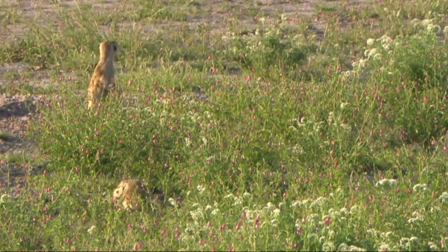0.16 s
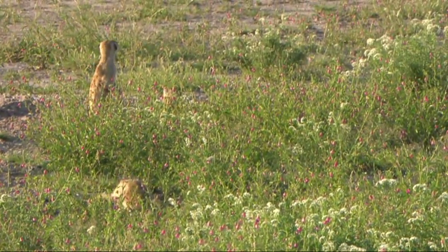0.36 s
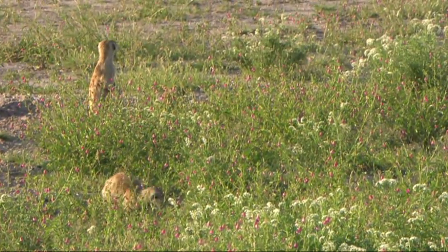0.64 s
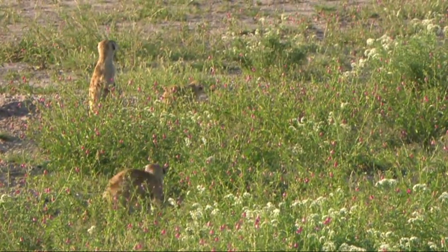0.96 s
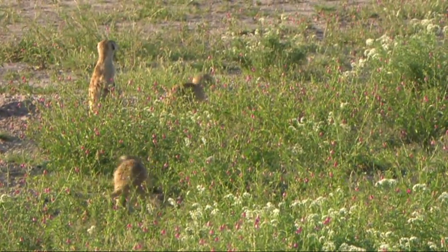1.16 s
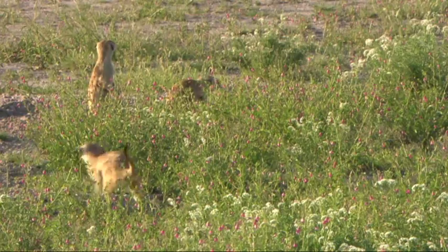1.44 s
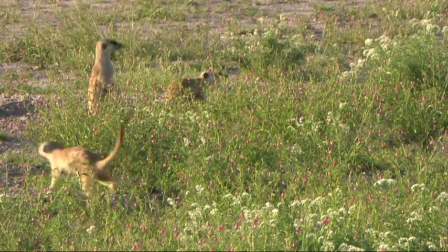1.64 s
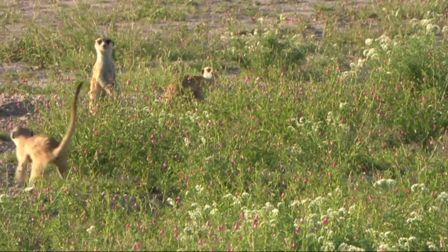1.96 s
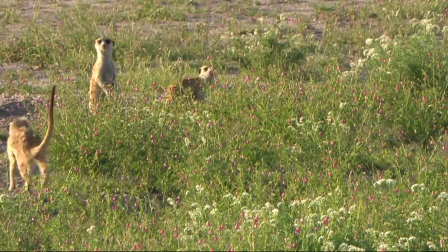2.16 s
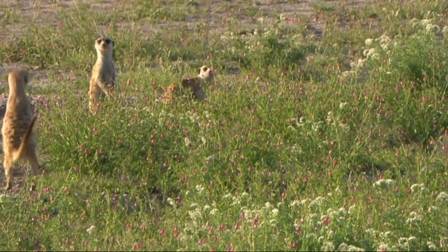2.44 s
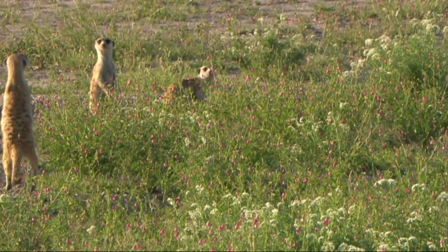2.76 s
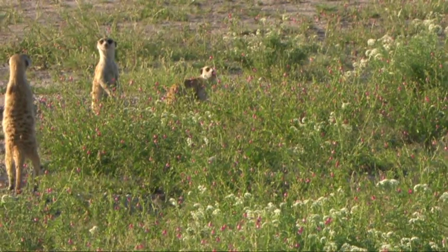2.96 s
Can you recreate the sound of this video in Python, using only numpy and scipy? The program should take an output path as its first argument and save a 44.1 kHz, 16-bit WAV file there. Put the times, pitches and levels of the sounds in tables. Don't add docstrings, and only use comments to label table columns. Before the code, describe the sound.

A nearby meerkat gives four harsh, rising, fluttering barks in quick succession while a fainter one overlaps farther off; one last distant bark follows, then low wind and faint hiss in an open field.

```python
import sys
import numpy as np
from scipy import signal
from scipy.fft import rfft, irfft, next_fast_len
from scipy.io import wavfile
from scipy.ndimage import uniform_filter1d, map_coordinates

SR = 44100
rng = np.random.default_rng(int(sys.argv[2]) if len(sys.argv) > 2 else 0)


def boost_factor(decibels):
    exponent = np.asarray(decibels, float) / 20
    return 10 ** exponent


def to_wav(sig):
    pcm = np.clip(np.atleast_2d(sig), -1, 1) * 32767
    pcm = np.round(pcm).astype(np.int16)
    wavfile.write(sys.argv[1], SR, pcm.T)


N = 136710

# time_s, low_pitch_hz, locked_pitch_hz, level_db, locked_share (of each beat, 0 none,
# 1 or more the whole beat)
NEAR_CALL_1 = [(0, 1148, 1390, -39.5, 0.5), (.03, 1148, 1370, -37.5, 0.72), (.048, 1175, 1367, -37, 1.11),
               (.053, 1160, 1428, -30.5, 1.2), (.06, 1150, 1500, -63, 1.1)]
NEAR_CALL_2 = [(.225, 590, 938, -53, 0.15), (.234, 660, 986, -44, 0.017), (.238, 700, 1045, -46.5, 0.031),
               (.278, 740, 1143, -40.5, 0.073), (.281, 794, 1173, -41.5, 0.064), (.3, 992, 1226, -43, 0.25),
               (.35, 1111, 1331, -40, 0.45), (.44, 1170, 1356, -38, 0.623), (.465, 1140, 1380, -35.5, 0.96),
               (.474, 1180, 1323, -34, 0.92), (.484, 1170, 1200, -63, 0.84)]
NEAR_CALL_3 = [(.583, 690, 1076, -49, 0.073), (.593, 740, 1085, -41.5, 0.1), (.62, 764, 1124, -40.5, 0.049),
               (.626, 792, 1154, -38.5, 0.13), (.642, 801, 1168, -40, 0.11), (.652, 957, 1219, -42, 0.47),
               (.675, 1100, 1271, -39.5, 0.56), (.71, 1120, 1335, -42.5, 0.47),
               (.74, 1103, 1320, -41, 0.63), (.76, 1135, 1321, -42.5, 0.47), (.79, 1145, 1380, -38.5, 0.34),
               (.802, 1215, 1370, -38, 0.64), (.816, 1245, 1393, -38.5, 0.46),
               (.826, 1260, 1400, -54, 0.51)]
NEAR_CALL_4 = [(.946, 587, 993, -48, 0.14), (.955, 615, 1001, -45.5, 0), (.959, 713, 984, -40, 0.076),
               (.972, 716, 1042, -41.5, 0.015), (.98, 812, 1083, -36.5, 0.031),
               (.992, 729, 1097, -41, 0.064), (.996, 826, 1144, -44, 0.03), (1.004, 908, 1204, -40.5, 0.37),
               (1.085, 1085, 1308, -41, 0.42), (1.107, 1107, 1333, -40, 0.54),
               (1.126, 1127, 1354, -38.5, 0.44), (1.185, 1201, 1380, -39, 0.56),
               (1.209, 1227, 1444, -31, 1), (1.221, 1188, 1305, -36.5, 1), (1.229, 1177, 1220, -65, 0.94)]
# time_s, low_pitch_hz, locked_pitch_hz, level_db, locked_share
FAR_CALL_LONG = [(.47, 797, 1140, -57, 0.12), (.505, 988, 1174, -57, 0.56), (.52, 974, 1197, -50.5, 0.62),
                 (.546, 1010, 1219, -54, 0.39), (.585, 1040, 1240, -51.5, 0.5),
                 (.65, 1090, 1306, -56, 0.41), (.703, 1120, 1390, -41, 0.56), (.715, 1190, 1387, -47.5, 1),
                 (.725, 1130, 1260, -50, 1), (.737, 1150, 1144, -75, 0.88)]
FAR_CALL_SHORT = [(1.76, 541, 816, -62, 0.36), (1.775, 604, 895.5, -53, 0), (1.794, 675, 970, -59, 0),
                  (1.798, 740, 1104, -53, 0.27), (1.814, 712, 1131, -53, 0.025),
                  (1.819, 797, 1159, -47.5, 0.1), (1.83, 763, 1192, -52, 0), (1.84, 1000, 1236, -53, 0.49),
                  (1.883, 1118, 1370, -48, 0.46), (1.89, 1140, 1417, -46.5, 0.68),
                  (1.905, 1110, 1283, -47.5, 1), (1.909, 1110, 1217, -63, 1), (1.914, 1050, 1116, -56.5, 1),
                  (1.924, 1000, 915, -54, 0.91)]
# time_s, low_pitch_hz, locked_pitch_hz, level_db, locked_share
SQUEAK_1 = [(.053, 1190, 1660, -44, 0.67), (.057, 1234, 1713, -45.5, 0.62), (.064, 1190, 1700, -43, 0.5),
            (.072, 1190, 1500, -50, 0.71), (.078, 1200, 1380, -60, 0.83)]
SQUEAK_3 = [(.812, 1215, 1640, -58, 0.58), (.818, 1220, 1754, -45, 0.69), (.824, 1227, 1785, -43, 0.77),
            (0.828, 1210, 1580, -44.5, 1), (.835, 1200, 1542, -66, 0.95)]
# time_s, beats_counted
NEAR_BEATS_1 = [(0, 0), (.033, 3), (.047, 4)]
NEAR_BEATS_2 = [(.284, -.5), (.304, 1), (.336, 3), (.436, 12), (.465, 14)]
NEAR_BEATS_3 = [(.64, -.5), (.652, 0), (.673, 1), (.691, 2), (.708, 3), (.737, 4), (.76, 5), (.803, 8),
                (.815, 9), (.83, 10)]
NEAR_BEATS_4 = [(.996, -.5), (1.007, 0), (1.027, 1), (1.043, 2), (1.063, 3), (1.108, 5), (1.126, 6),
                (1.198, 12), (1.211, 13)]
FAR_BEATS_LONG = [(.48, -2), (.508, 0), (.585, 6), (.701, 16), (.713, 17)]
FAR_BEATS_SHORT = [(1.83, -.5), (1.851, 1), (1.883, 4), (1.892, 5)]
# shift_s, level_db
FAR_REPEATS = [
    (-1.47, -3),
    (-.73, -5),
]
# multiple, level_db
NEAR_OVERTONES = [(1, -14), (2, -2), (3, -16.5), (4, -17), (5, -28.5), (6, -25.5), (7, -34.5), (8, -35.5),
                  (9, -39), (10, -41), (11, -40)]
FACING_OVERTONES = [(1, -12.5), (2, -3.5), (3, -18), (4, -20.5), (5, -20.5), (6, -30.5), (7, -39)]
FAR_OVERTONES = [(1, -36), (2, -4), (3, -11.5), (4, -9.5), (5, -15), (6, -21)]
FAR_BRIGHT_OVERTONES = [(2, 0.5), (3, -0.5), (4, -15), (5, -9.5), (6, -26)]
SQUEAK_OVERTONES = [(1, -4.5), (2, 0), (3, -10), (4, -24), (5, -29)]
# frequency_hz, level_db
ROUGH_THROAT = [(700, -20), (1150, -9), (1800, -8), (2800, -5.5), (3500, -1.5), (4600, -19), (6600, -34),
                (7500, -38.5)]
# frequency_hz, level_db
CLEAN_THROAT = [(700, -18.5), (1450, -8), (2150, 0), (2900, -6), (3600, -22), (4300, -25), (5000, -16),
                (6000, -50)]
# frequency_hz, level_db
SPRAY_SPECTRUM = [(3500, -10), (5200, 12.5), (6200, -26), (7800, 0), (15000, -55)]
# frequency_hz, density_db (per Hz)
RUMBLE_SPECTRUM = [(8.8, -40), (15, -15), (48, 0.5), (134, -5.5), (301, -9.5), (339, -9), (900, -29),
                   (1170, -82), (1980, -120)]
# centre_hz, width_hz, level_db
DRONE_BANDS = [
    (90.7, 6.7, -61.5),
    (133, 10, -61),
]
# frequency_hz, density_db (per Hz)
HISS_SPECTRUM = [(410, -1), (700, -24.5), (968, -3.5), (1900, -5.5), (3880, -15.5), (15600, -21.5)]
# start_s, length_s, pitch_hz, level_db
FAR_NOTES = [(1.664, 0.052, 1440, -66.5)]
# start_s, peak_db
TAPS = [
    (2.363, -40.5),
]
# frequency_hz, level_db, t60_s
TAP_MODES = [(239, 2.5, 0.13), (530, -4.5, 0.055), (1500, 4.5, 0.011), (2940, -9, 0.011)]


def unit(x):
    return x / np.sqrt(np.mean(x ** 2) + 1e-20)


def along(points, hz):
    f, v = np.transpose(points)
    return np.interp(np.log(hz + 1), np.log(f + 1), v)


def wobble(rate, size=N):
    knots = rng.standard_normal(int(size * rate / SR) + 4)
    return map_coordinates(knots, [np.arange(size) * rate / SR])


def filtered(x, response):
    m = next_fast_len(len(x) + 8192)
    return irfft(rfft(x, m) * response(np.fft.rfftfreq(m, 1 / SR)), m)[:len(x)]


def coloured_noise(spectrum, patchy_db):
    z = signal.stft(rng.standard_normal(N), nperseg=512)[2]
    patches = uniform_filter1d(rng.standard_normal(z.shape), size=5, axis=0)
    patches = uniform_filter1d(patches, size=12, axis=1)
    noise = signal.istft(z * boost_factor(patchy_db * unit(patches)), nperseg=512)[1][:N]
    return unit(filtered(noise, lambda hz: boost_factor(along(spectrum, hz))))


def add(out, start_s, x):
    out[round(start_s * SR):][:len(x)] += x


def breath(response, size):
    return unit(filtered(rng.standard_normal(SR // 2), response))[:size]


def low_voice(low_hz, mouth, rough, far):
    roughness_hz, scatter, shimmer_db = 350, .045, 3
    rough_gain_db, clean_gain_db, far_gain_db = -2, 0.5, 6.5
    size = len(low_hz)
    muffle_db = 14 * np.clip((710 - low_hz) / 40, 0, 1)
    low_hz = low_hz * (1 + (0.0017 + scatter * rough) * wobble(roughness_hz, size))
    phase = 2 * np.pi * np.cumsum(low_hz) / SR
    out = np.zeros(size)
    for k in range(1, 13):
        rough_db = along(ROUGH_THROAT, k * low_hz / mouth) + rough_gain_db + far * far_gain_db
        clean_db = along(CLEAN_THROAT, k * low_hz) + clean_gain_db - muffle_db * (k > 3)
        shimmer = shimmer_db * rough * wobble(roughness_hz, size)
        level_db = rough * rough_db + (1 - rough) * clean_db + shimmer
        out += boost_factor(level_db) * np.cos(k * phase + 0.312 * k * k)
    return out


def locked_voice(high_hz, mouth, share, age, flutter, overtones, far):
    sag, jitter, shut = .04, .03, .11
    dull_db, period_doubling_db, spray_db = 43, -19.5, -23
    lift_hz, lift_width_hz, lift_db = 4990, 475, 3.5
    veil_db, top_veil_db = 1 + far * 9, 4.5
    size = len(high_hz)
    pitch_hz = high_hz * (1 - sag * age + jitter * (1 - share) * wobble(399.3, size))
    phase = 2 * np.pi * np.cumsum(pitch_hz) / SR
    widest = np.maximum.accumulate(mouth)
    closed = np.maximum(1 - widest, widest - mouth - shut)
    out = boost_factor(spray_db) * flutter * breath(lambda hz: boost_factor(along(SPRAY_SPECTRUM, hz)), size)
    for k, level_db in overtones:
        dulling = dull_db * closed * max(k - 2, 0) ** .5
        veil = flutter * (veil_db * (k > 2) + top_veil_db * (k > 5))
        lift = lift_db * flutter * np.exp(-((k * high_hz - lift_hz) / lift_width_hz) ** 2)
        out += boost_factor(level_db - dulling - veil + lift) * np.cos(k * phase + .5 * (k % 2))
    doubling = boost_factor(period_doubling_db) * 4 * (1 - share) * np.abs(wobble(42.0, size))
    return out * (1 + doubling * np.cos(phase / 2))


def call(rows, beats, overtones, far=False):
    edge_softness, leak, fade_db = 0.31, 0.47, 5
    low_db, rasp_db, wide_hz = -7.5, -13.5, 1380
    s, *cols = np.transpose(rows)
    t = s[0] + np.arange(round((s[-1] - s[0]) * SR)) / SR
    low_hz, high_hz, level_db, share = [np.interp(t, s, c) for c in cols]
    beat = np.interp(t, *np.transpose(beats))
    share = np.where(beat > beats[-1][1] - .5, share, np.minimum(share, .7))
    beat_phase = beat - np.round(beat)
    edge = edge_softness * np.where(beat_phase < 0, .5, 2)
    locked = np.clip((share * (1 + edge) - 2 * np.abs(beat_phase)) / edge, 0, 1)
    locked = locked ** 2 * (3 - 2 * locked)
    rough = np.clip(share / 0.26, 0, 1)
    flutter = np.clip((1 - share) / 0.49, 0, 1)
    age = beat_phase * np.clip((1 - share) / 0.73, 0, 1)
    mouth = np.clip(high_hz / wide_hz, .5, 1)
    high = locked_voice(high_hz, mouth, share, age, flutter, overtones, far)
    low = low_voice(low_hz, mouth, rough, far)
    rasp = breath(lambda hz: boost_factor(along(ROUGH_THROAT, hz)) * (hz > 600), len(t))
    under = 1 - locked + leak * locked * flutter
    voice = locked * boost_factor(-fade_db * age) * high
    voice += under * (boost_factor(low_db) * low + boost_factor(rasp_db) * (0.041 + rough) * rasp)
    ramp = np.clip(np.minimum(s[-1] - t, t - s[0] + (s[0] == 0)) / 0.0024, 0, 1)
    return -np.sqrt(2) * boost_factor(level_db) * voice * ramp


def near_caller():
    out = np.zeros(N)
    for rows, beats, overtones in [(NEAR_CALL_1, NEAR_BEATS_1, FACING_OVERTONES),
                                   (NEAR_CALL_2, NEAR_BEATS_2, NEAR_OVERTONES),
                                   (NEAR_CALL_3, NEAR_BEATS_3, NEAR_OVERTONES),
                                   (NEAR_CALL_4, NEAR_BEATS_4, NEAR_OVERTONES)]:
        add(out, rows[0][0], call(rows, beats, overtones))
    return out


def wind_rumble():
    return boost_factor(-50 + .8 * wobble(6)) * coloured_noise(RUMBLE_SPECTRUM, patchy_db=1)


def engine_drone():
    out = np.zeros(N)
    for centre_hz, width_hz, level_db in DRONE_BANDS:
        band = filtered(rng.standard_normal(N), lambda hz: np.exp(-((hz - centre_hz) / width_hz) ** 2))
        out += boost_factor(level_db) * unit(band)
    return out


def air_hiss():
    return boost_factor(-66) * coloured_noise(HISS_SPECTRUM, patchy_db=1.06)


def field_echo(x):
    rise_s, t60_s, level_db = 0.0097, 0.24, -32
    t = np.arange(SR // 4) / SR
    tail = rng.standard_normal(len(t)) * boost_factor(-60 * t / t60_s) * np.clip(t / rise_s, 0, 1) ** 2
    tail = filtered(tail, lambda hz: 1 / (1 + (hz / 3800) ** 6))
    return boost_factor(level_db) * signal.fftconvolve(x, tail / np.linalg.norm(tail))[:N]


def closing_squeaks():
    out = np.zeros(N)
    for rows in (SQUEAK_1, SQUEAK_3):
        add(out, rows[0][0], call(rows, [(0, 0)], SQUEAK_OVERTONES))
    return out


def far_caller():
    ground_hz = 1700
    out = np.zeros(N)
    start_s = FAR_CALL_SHORT[0][0]
    for shift_s, level_db in FAR_REPEATS:
        repeat = call(FAR_CALL_SHORT, FAR_BEATS_SHORT, FAR_BRIGHT_OVERTONES)
        add(out, start_s + shift_s, boost_factor(level_db) * repeat)
    long_call = call(FAR_CALL_LONG, FAR_BEATS_LONG, FAR_BRIGHT_OVERTONES, far=True)
    add(out, FAR_CALL_LONG[0][0], long_call)
    add(out, start_s, call(FAR_CALL_SHORT, FAR_BEATS_SHORT, FAR_OVERTONES))
    return filtered(out, lambda hz: 1 / (1 + (ground_hz / (hz + 1)) ** 6))


def far_notes():
    out = np.zeros(N)
    for start_s, length_s, pitch_hz, level_db in FAR_NOTES:
        t = np.arange(round(length_s * SR)) / SR
        swell = np.sqrt(np.sin(np.pi * t / length_s))
        add(out, start_s, boost_factor(level_db) * swell * np.sin(2 * np.pi * pitch_hz * t))
    return out


def soft_tap():
    out = np.zeros(N)
    t = np.arange(SR // 10) / SR
    for start_s, peak_db in TAPS:
        ring = sum(boost_factor(db - 60 * t / t60_s) * np.sin(2 * np.pi * hz * t) for hz, db, t60_s in TAP_MODES)
        contact = unit(filtered(rng.standard_normal(len(t)), lambda hz: 1 / (1 + (hz / 1800) ** 4)))
        contact *= boost_factor(-6 - 60 * t / 0.04)
        onset = 1 - np.exp(-t / 0.00072)
        add(out, start_s - .001, boost_factor(peak_db - 1.5) * (ring + contact) * onset)
    return out


def scene():
    voices = near_caller() + closing_squeaks() + far_caller()
    background = wind_rumble() + engine_drone() + air_hiss()
    return (voices + field_echo(voices) + background + far_notes() + soft_tap())[None]


def band_limit(x):
    return signal.sosfilt(signal.butter(12, 15800, fs=SR, output="sos"), x)


def record(dry):
    top_hz = 15800
    mix = filtered(dry[0], lambda hz: hz < top_hz)[None]
    return band_limit(mix)


dry = scene()
out = record(dry)
to_wav(out)
```